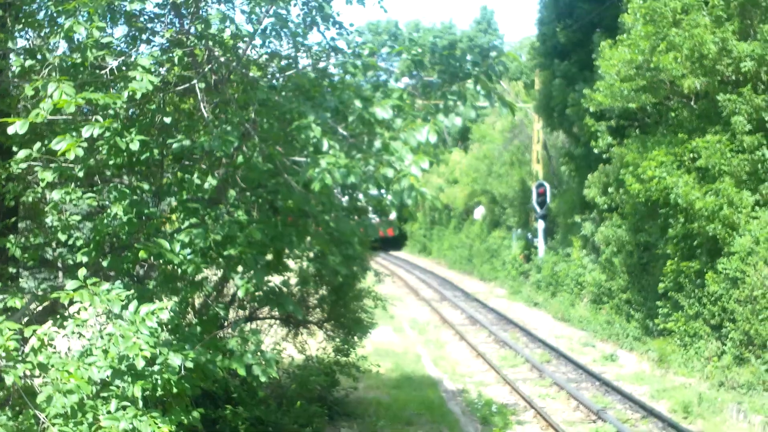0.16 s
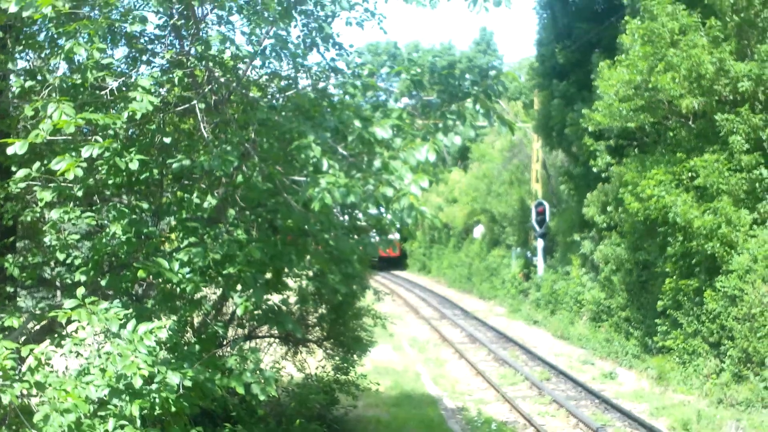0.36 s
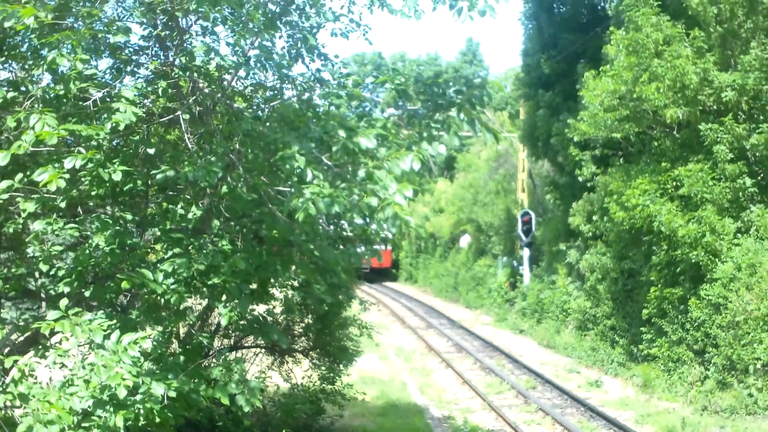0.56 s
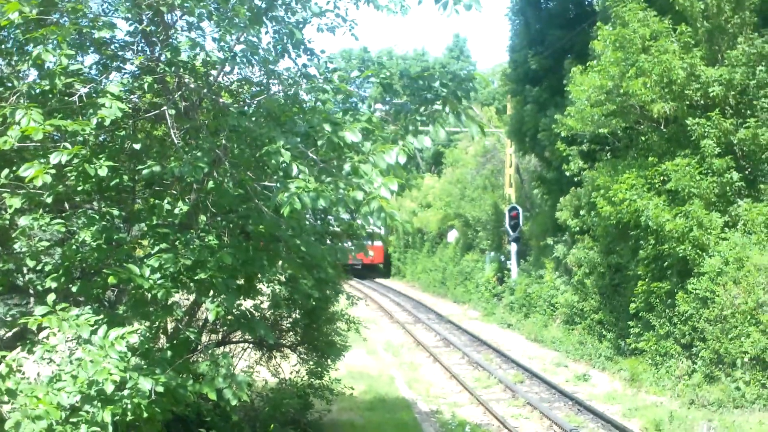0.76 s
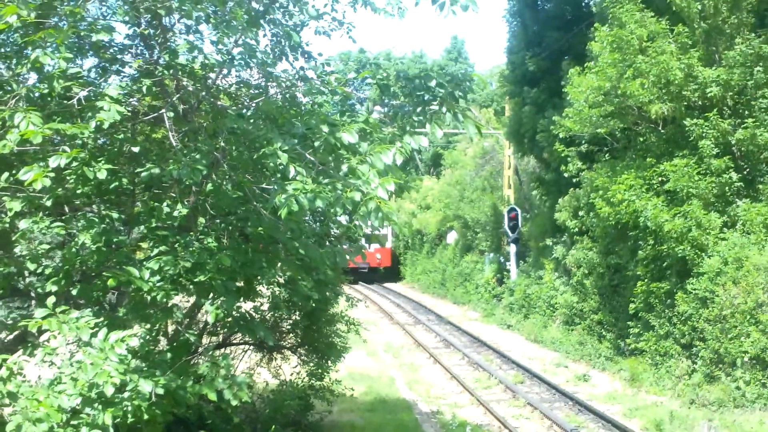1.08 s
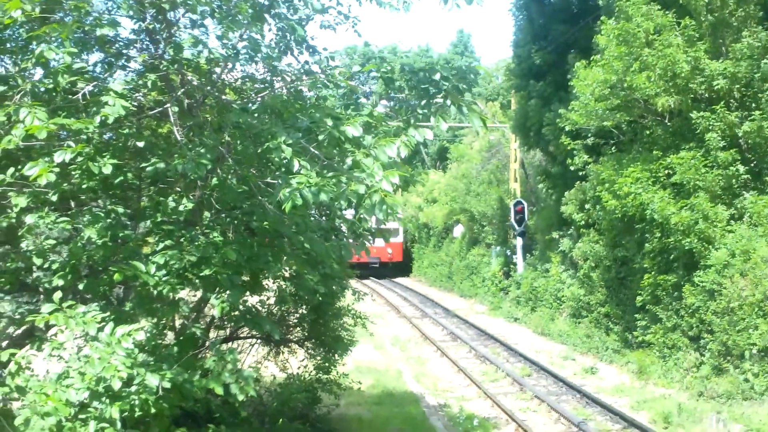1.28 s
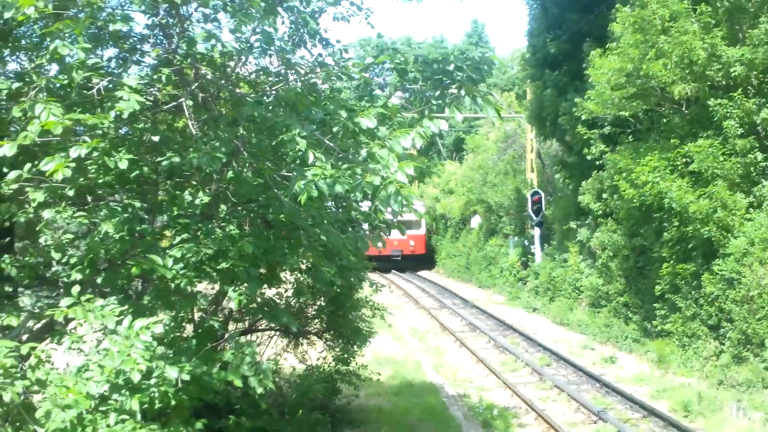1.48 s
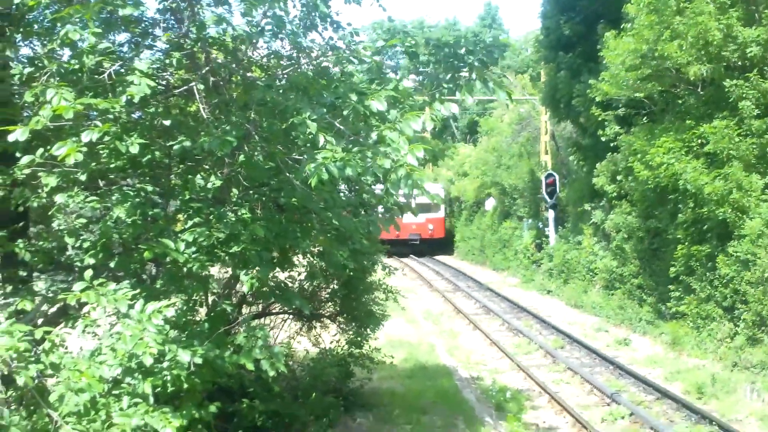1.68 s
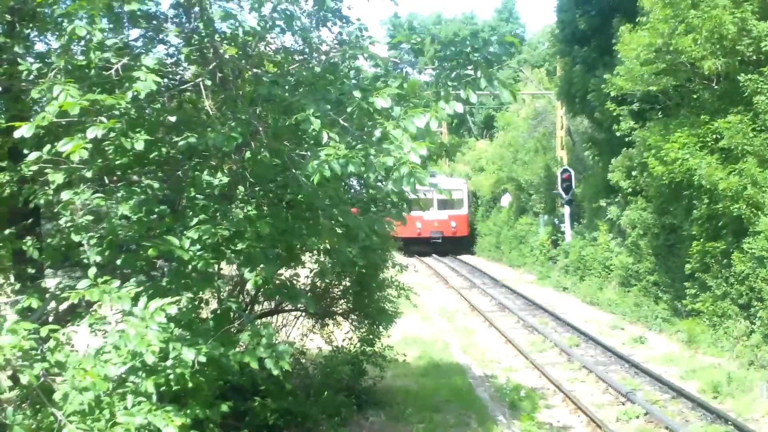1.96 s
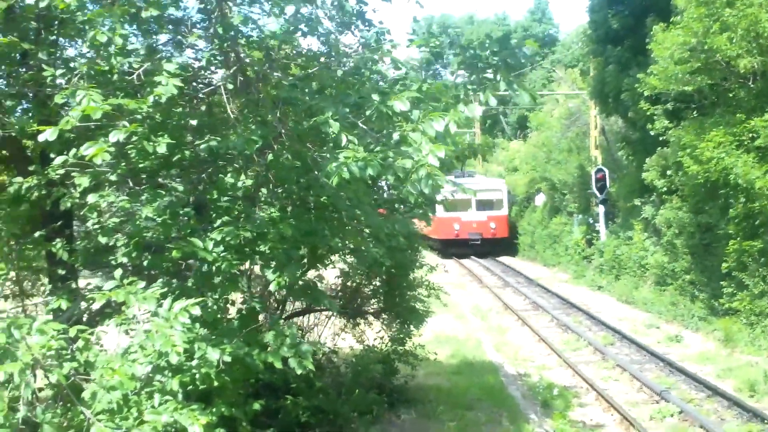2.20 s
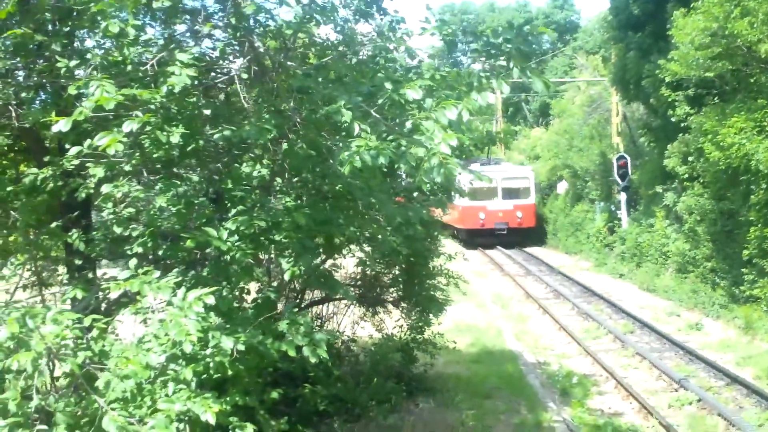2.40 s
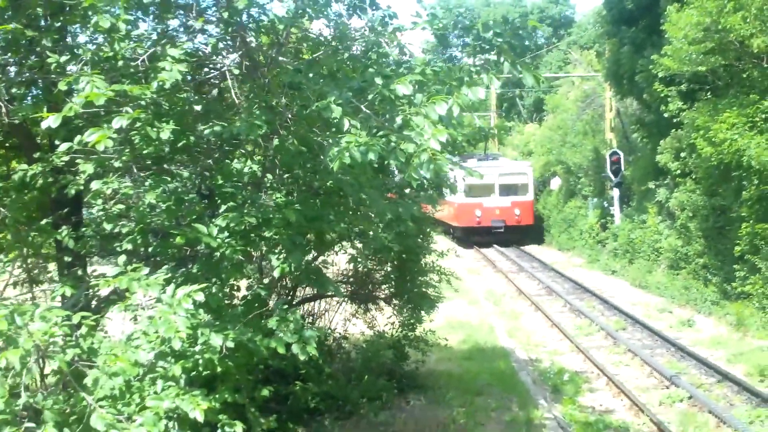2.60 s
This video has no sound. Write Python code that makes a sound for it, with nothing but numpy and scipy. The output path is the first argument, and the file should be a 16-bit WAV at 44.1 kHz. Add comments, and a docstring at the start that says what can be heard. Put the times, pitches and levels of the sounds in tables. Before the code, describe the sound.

A train approaches slowly, its rails whirring and hissing over a low rumble.

```python
"""Rack-railway train climbing

A train climbs slowly toward the listener among trees. Excited by the wheels, the rails sing
ahead of it in a whirring, surging hiss over the roar of the wheels and the hum of the drive.
Light wind rumbles at the microphone, and a few dull thumps sound close by."""
import sys
import numpy as np
from scipy import signal
from scipy.fft import rfft, irfft
from scipy.io import wavfile
from scipy.ndimage import uniform_filter1d

SR = 44100
rng = np.random.default_rng(int(sys.argv[2]) if len(sys.argv) > 2 else 0)


def master_out(mix):
    """Clip the mix to full scale and print it as 16-bit PCM to the path in sys.argv[1]."""
    frames = np.transpose(np.atleast_2d(mix))
    ceiling = np.clip(frames, -1, 1)
    pcm = np.round(ceiling * 32767).astype(np.int16)
    wavfile.write(sys.argv[1], SR, pcm)


N = 120834
TIME = np.arange(N) / SR
HZ = np.fft.rfftfreq(N, 1 / SR)


def amp(db):
    """Decibels to gain."""
    return 10 ** (np.asarray(db) / 20)


def unit(x):
    """Scale to rms 1."""
    return x / np.sqrt(np.mean(x ** 2) + 1e-20)


def curve(points, t):
    """Interpolate a time curve."""
    return np.interp(t, *np.transpose(points))


def spectrum(points, hz):
    """Interpolate a dB spectrum on a log-frequency axis."""
    points_hz, db = np.transpose(points)
    return np.interp(np.log(hz + 1), np.log(points_hz + 1), db)


def swell(centre_s, half_width_s):
    """Gaussian envelope, peak 1."""
    return np.exp(-((TIME - centre_s) / half_width_s) ** 2)


def rolloff(corner_hz, centre_hz=0):
    """Gain per frequency: 1 at the centre, 1/2 at corner_hz to either side."""
    return 1 / (1 + ((HZ - centre_hz) / corner_hz) ** 2)


def colour(x, gain):
    """Filter by a gain per frequency."""
    return irfft(rfft(x) * gain, N)


def coloured_noise(gain):
    """Steady filtered noise, rms 1."""
    return unit(colour(rng.standard_normal(N), gain))


def wander(rate_hz):
    """Smooth random drift, rms 1, mostly below rate_hz."""
    return coloured_noise((HZ > 0) * rolloff(rate_hz) ** 2)


def patches(shape, frames, bins):
    """Random field, rms 1, smoothed over frames and bins."""
    field = uniform_filter1d(rng.standard_normal(shape), frames, axis=0)
    return unit(uniform_filter1d(field, bins, axis=1))


def grid(fft_size):
    """Frame times (a column) and bin frequencies of short-time spectra."""
    hop = fft_size // 4
    return np.arange(N // hop + 2)[:, None] * hop / SR, np.fft.rfftfreq(fft_size, 1 / SR)


def field_noise(db, fft_size):
    """Noise, rms 1, shaped by a dB field over (frames, bins)."""
    spectra = (rng.standard_normal(db.shape) + 1j * rng.standard_normal(db.shape)) * amp(db)
    _, sound = signal.istft(spectra.T, nperseg=fft_size, noverlap=fft_size - fft_size // 4)
    return unit(sound[:N])


# time_s, level_db
HISS_LEVEL = [(0.19, -59), (0.8, -70), (0.87, -79), (1.25, -64), (1.7, -66), (2.74, -73)]

def hiss():
    """Faint white hiss."""
    return amp(curve(HISS_LEVEL, TIME)) * rng.standard_normal(N)


# freq_hz, relative_db
WIND_SPECTRUM = [(8, -10), (22, -5), (42, 0.5), (60, -0.5), (80, -8.5), (125, -17.5), (300, -49)]
# time_s, level_db
GUST_LEVEL = [(0.19, -29.5), (0.61, -28.5), (0.68, -32.5), (1.1, -34), (1.35, -31), (1.71, -30),
              (2.06, -25), (2.15, -35), (2.26, -32), (2.42, -27.5), (2.5, -34.5), (2.74, -28.5)]

def wind():
    """Gusts of air rumble at the microphone."""
    air = coloured_noise(amp(spectrum(WIND_SPECTRUM, HZ)) * rolloff(corner_hz=600))
    return amp(curve(GUST_LEVEL, TIME)) * air


# start_s, level_db, pitch_hz, decay_s
THUMP_EVENTS = [(0.8117, -21, 143, 0.0075), (0.818, -23, 317, 0.0074), (0.824, -23.5, 224, 0.012),
                (1.1081, -15, 183, 0.0032), (1.654, -28.5, 288, 0.0084), (1.707, -18.5, 72, 0.0086),
                (1.904, -31, 165, 0.0046), (2.043, -23.5, 252, 0.011), (2.053, -27, 153, 0.008)]

def thumps(rise_s=0.0023, rustle_db=-16):
    """Dull thumps: low tones that die at once, with a little rustle."""
    out = np.zeros(N)
    rustle = amp(rustle_db) * coloured_noise(rolloff(corner_hz=800))
    for start_s, level_db, pitch_hz, decay_s in THUMP_EVENTS:
        age_s = np.maximum(TIME - start_s, 0)
        envelope = (1 - np.exp(-age_s / rise_s)) * np.exp(-age_s / decay_s)
        tone = np.sin(2 * np.pi * pitch_hz * age_s)
        out += amp(level_db) * envelope / envelope.max() * (tone + rustle)
    return out


# freq_hz, relative_db
CARRIAGE_SPECTRUM = [(40, -21), (90, 3.5), (125, -1.5), (170, -1), (225, -4.5), (275, -2), (330, -7.5),
                     (390, -11.5), (700, -25)]
# time_s, level_db
CARRIAGE_LEVEL = [(0.19, -33), (0.44, -34), (0.52, -39), (0.71, -32.5), (0.78, -34), (1.0, -35), (1.2, -36),
                  (1.43, -37.5), (1.65, -32), (1.8, -42.5), (1.91, -31), (1.98, -32), (2.06, -32),
                  (2.14, -41.5), (2.33, -30.5), (2.5, -40), (2.74, -35.5)]

def carriage(flutter_db=1.5):
    """The car body rumbles, low and uneven."""
    rumble = coloured_noise(amp(spectrum(CARRIAGE_SPECTRUM, HZ)) * rolloff(corner_hz=900))
    flutter = amp(flutter_db * wander(rate_hz=28))
    return amp(curve(CARRIAGE_LEVEL, TIME)) * unit(rumble * flutter)


# harmonic, relative_db
GEAR_ORDERS = [(2, -38.5), (3, -42), (4, -54.5), (6, -52.5), (7, -50), (11, -51.5), (13, -65), (19, -60.5)]
# time_s, gain_db
HUM_GAIN = [(0.19, -1.5), (1.35, -8), (1.65, 0.5), (2.0, 2.5), (2.4, 1), (2.74, -3)]

def drive(base_hz=70.2, waver=0.00785, flutter_db=1.95):
    """The gear drive hums in harmonics of one wavering frequency."""
    turns = np.cumsum(base_hz * (1 + waver * wander(rate_hz=4.24))) / SR
    hum = np.zeros(N)
    for harmonic, relative_db in GEAR_ORDERS:
        gain = amp(relative_db + flutter_db * wander(rate_hz=16))
        hum += gain * np.sin(2 * np.pi * (harmonic * turns + rng.random()))
    return hum * amp(curve(HUM_GAIN, TIME))


# time_s, level_db
DRONE_LEVEL = [(0.19, -38), (0.31, -29.5), (0.45, -27.5), (0.6, -23.5), (0.75, -34), (1.1, -30),
               (1.4, -27.5), (1.9, -33), (2.15, -35), (2.25, -28.5), (2.74, -33.5)]

def drone(pitch_hz=40.4, drift_hz=2.935):
    """Deep, narrow drone of the drive, drifting in pitch."""
    turns = np.cumsum(pitch_hz + drift_hz * wander(rate_hz=5.23)) / SR
    return np.sqrt(2) * np.sin(2 * np.pi * turns) * amp(curve(DRONE_LEVEL, TIME))


# freq_hz, relative_db
ROAR_SPECTRUM = [(60, 4), (250, 1.5), (400, 0), (480, 2), (525, -6.5), (600, 5), (650, -1.5), (740, 2),
                 (950, -2.5), (1350, -3), (1650, -5.5), (2400, -6.5), (3500, -11.5), (6000, -37.5)]
# time_s, relative_db
ROAR_ENVELOPE = [(0.2, -36), (0.54, -37.5), (0.64, -41), (0.79, -36.5), (0.82, -35.5), (0.84, -39.5),
                 (1.45, -39.5), (1.64, -37), (2.6, -39), (2.65, -35.5), (2.71, -38.5), (2.74, -37)]

def wheels(gain_db=3, patch_db=0.6, resonance_db=2):
    """Distant rolling roar with many drifting body resonances."""
    t, hz = grid(fft_size=2048)
    db = spectrum(ROAR_SPECTRUM, hz) + np.zeros_like(t)
    db += patch_db * patches(db.shape, frames=6, bins=14)
    db += resonance_db * patches(db.shape, frames=50, bins=1)
    return field_noise(db, fft_size=2048) * amp(gain_db + curve(ROAR_ENVELOPE, TIME))


# centre_s, level_db, half_width_s
SIZZLE_SWELLS = [(0.823, -53.5, 0.014), (1.7, -54.5, 0.064), (2.53, -53, 0.021), (2.7, -49.5, 0.07)]
# freq_hz, relative_db
SIZZLE_SPECTRUM = [(3000, -30), (6700, 8), (10500, -13), (15000, -36)]

def sizzle():
    """Brief swells of bright wheel friction."""
    envelope = sum(amp(db) * swell(centre_s, half_s) for centre_s, db, half_s in SIZZLE_SWELLS)
    return envelope * coloured_noise(amp(spectrum(SIZZLE_SPECTRUM, HZ)))


# centre_s, level_db
RATTLE_EVENTS = [(0.815, -33), (0.91, -41), (2.34, -37), (2.69, -38)]
# freq_hz, relative_db
RATTLE_SPECTRUM = [(1200, -44), (2100, 0), (2420, 16), (2950, -11), (3700, 14), (4400, -2), (7000, -27.5)]

def rattles(clicks_per_s=530, decay_s=0.0018, half_width_s=0.019):
    """Short clusters of small metal clicks, carried along the rails."""
    impulses = rng.standard_normal(N) * (rng.random(N) < clicks_per_s / SR)
    t = TIME[:SR // 10]
    click = rng.standard_normal(len(t)) * np.exp(-t / decay_s)
    clicks = signal.fftconvolve(impulses, click)[:N]
    envelope = sum(amp(db) * swell(centre_s, half_width_s) for centre_s, db in RATTLE_EVENTS)
    return envelope * unit(colour(clicks, amp(spectrum(RATTLE_SPECTRUM, HZ))))


# freq_hz, corner_hz, relative_db
CLANG_MODES = [(2400, 40, 6.5), (2553, 81, 1.5)]
# time_s, level_db
CLANG_ENVELOPE = [(0.19, -47.5), (0.7, -51.5), (0.91, -44), (1.0, -47.5), (1.55, -54), (1.72, -46),
                  (2.05, -47), (2.26, -61), (2.33, -40), (2.47, -44), (2.57, -54), (2.68, -45)]

def clang():
    """Rolling friction feeds a lower pair of rail resonances, which swell and fade."""
    gain = sum(amp(db) * rolloff(corner_hz, hz) ** 2 for hz, corner_hz, db in CLANG_MODES)
    return coloured_noise(gain) * amp(curve(CLANG_ENVELOPE, TIME))


# centre_s, pitch_hz, level_db, half_width_s
FLARE_EVENTS = [(0.36, 3760, -41, 0.052), (0.41, 3634, -43, 0.13), (0.93, 3660, -38, 0.048),
                (1.72, 3785, -40, 0.054), (2.03, 3750, -42.5, 0.062), (2.13, 3600, -41.5, 0.15),
                (2.59, 4160, -40, 0.066), (2.71, 4170, -35.5, 0.05), (2.72, 3600, -37, 0.043)]

def flares(corner_hz=58):
    """The wheels catch one narrow rail resonance after another; each swells, wavers and fades."""
    out = np.zeros(N)
    for centre_s, pitch_hz, level_db, half_width_s in FLARE_EVENTS:
        ring = coloured_noise(rolloff(corner_hz, pitch_hz) ** 2)
        out += amp(level_db) * swell(centre_s, half_width_s) * ring
    return out


# freq_hz, relative_db
RAIL_SPECTRUM = [(1200, -16.5), (2200, -13), (2580, -6.5), (2900, -10.5), (3350, -7), (3620, -0.5),
                 (3950, -1), (4300, 0.5), (4700, -4), (5100, -11.5), (5500, -22), (6250, -19.5),
                 (6900, -25), (7700, -26), (9300, -37), (15500, -55)]
# freq_hz, width_hz, boost_db
RAIL_RESONANCES = [(2072, 36, 10), (3340, 36, 8), (5810, 180, 7), (7980, 120, 7)]
# time_s, gain_db
TREBLE_SHELF = [(0.19, 2), (0.34, -1.5), (0.55, -4.5), (0.64, 0.5), (0.88, -4), (0.95, -0.5), (1.3, 0.5),
                (1.58, -0.5), (2.0, -0.5), (2.74, 0.5)]
# time_s, level_db
WHEEL_EXCITATION = [(0.2, -36), (0.28, -38), (0.35, -35), (0.53, -34.5), (0.55, -30), (0.57, -36),
                    (0.97, -34.5), (1.25, -36), (1.62, -33), (1.72, -32.5), (1.9, -34.5), (2.03, -31.5),
                    (2.1, -34.5), (2.27, -35.5), (2.35, -31), (2.48, -34), (2.57, -31.5), (2.72, -30.5)]

def rails(shelf_hz=5540, patch_db=1.07, resonance_db=1.0, flutter_db=0.82):
    """Rail resonances, fed by the wheels, swell and fade separately and flutter together."""
    t, hz = grid(fft_size=1024)
    db = spectrum(RAIL_SPECTRUM, hz)
    for freq_hz, width_hz, boost_db in RAIL_RESONANCES:
        db += boost_db / (1 + (2 * (hz - freq_hz) / width_hz) ** 2)
    db = db + curve(TREBLE_SHELF, t) * (hz > shelf_hz)
    db += patch_db * patches(db.shape, frames=14, bins=8)
    db += resonance_db * patches(db.shape, frames=60, bins=1)
    singing = field_noise(db, fft_size=1024)
    return singing * amp(curve(WHEEL_EXCITATION, TIME) + flutter_db * wander(rate_hz=49))


def scene():
    """Track, train and surroundings, mono."""
    track = rails() + flares() + clang() + rattles() + sizzle()
    train = wheels() + carriage() + drive() + drone()
    surroundings = hiss() + wind() + thumps()
    return (track + train + surroundings)[None]


def record(dry, start_s=0.1905, fade_s=0.001, cutoff_hz=15750):
    """The sound cuts in after a moment of silence and is low-passed."""
    gate = np.clip((TIME - start_s) / fade_s, 0, 1)
    lowpass = signal.firwin(511, cutoff_hz, window=("kaiser", 9), fs=SR)
    return signal.oaconvolve(dry * gate, lowpass[None], "same")


dry = scene()
out = record(dry)
master_out(out)
```